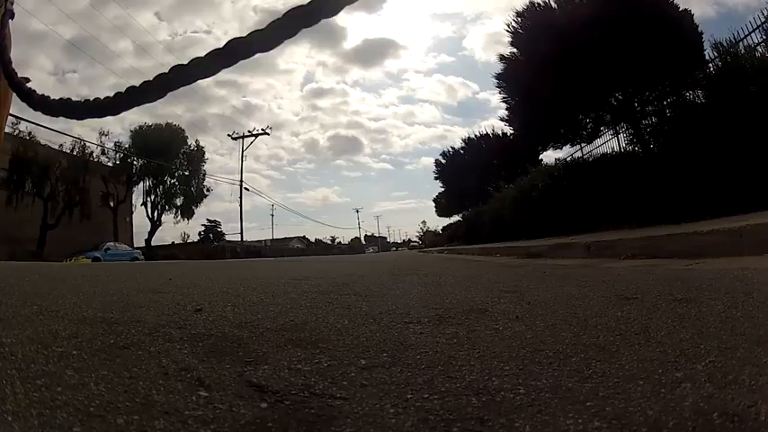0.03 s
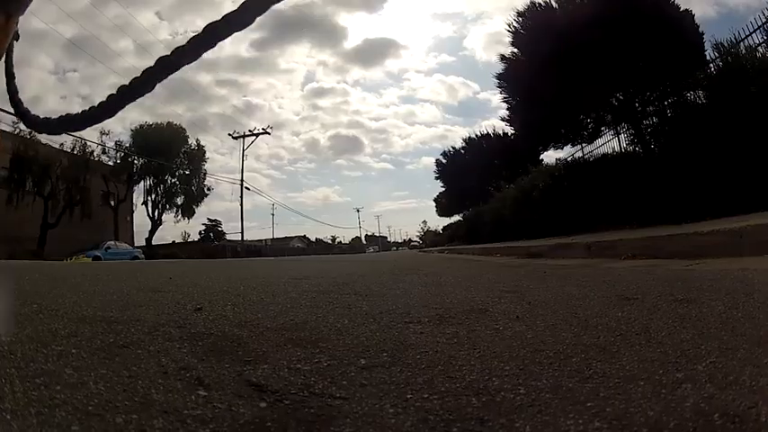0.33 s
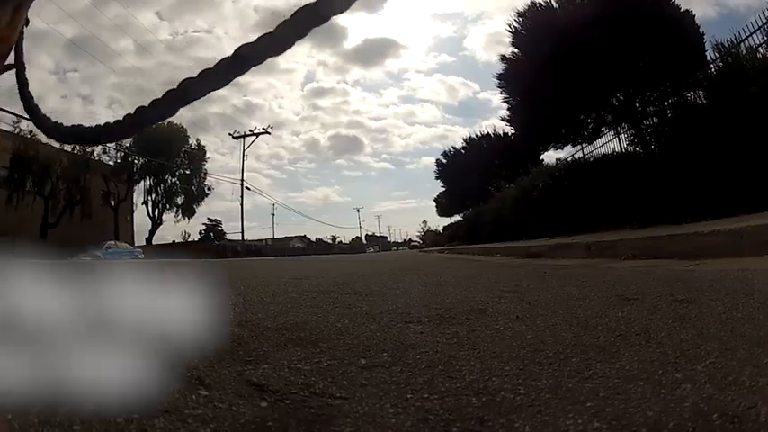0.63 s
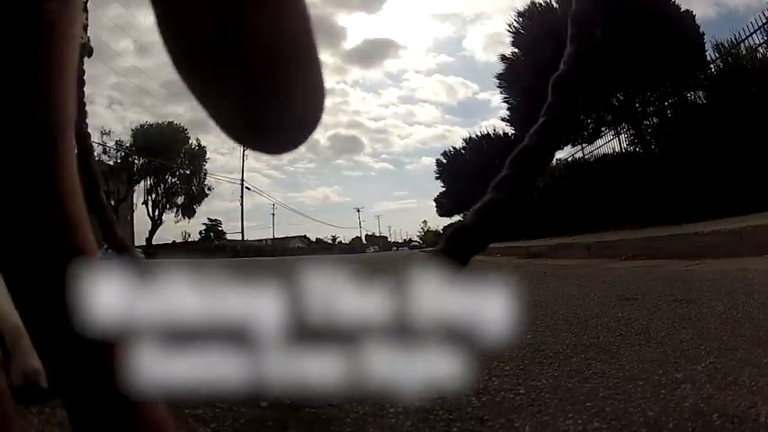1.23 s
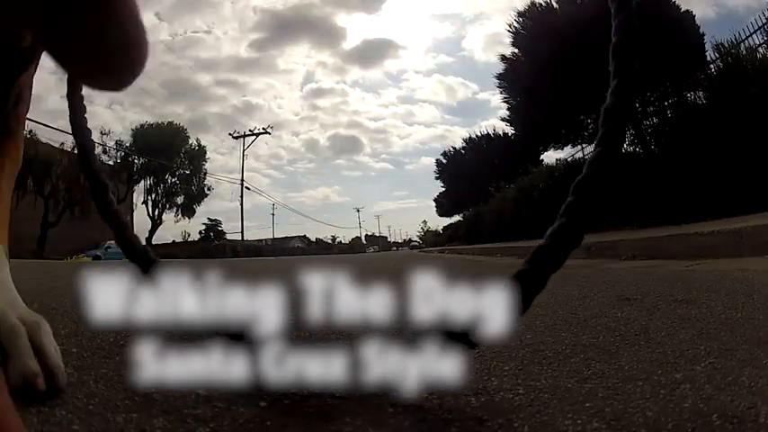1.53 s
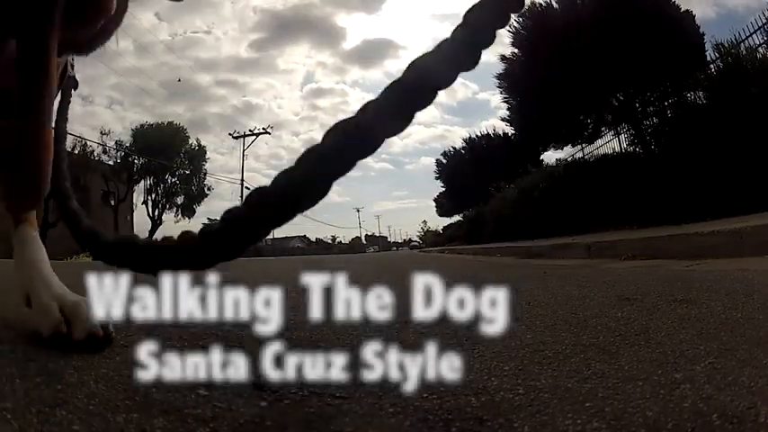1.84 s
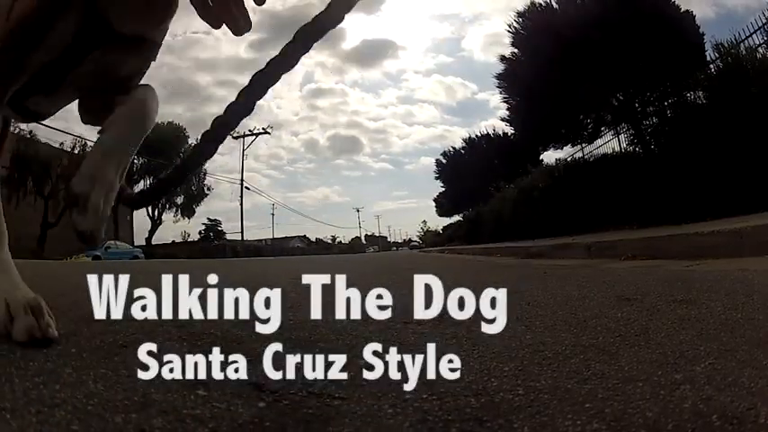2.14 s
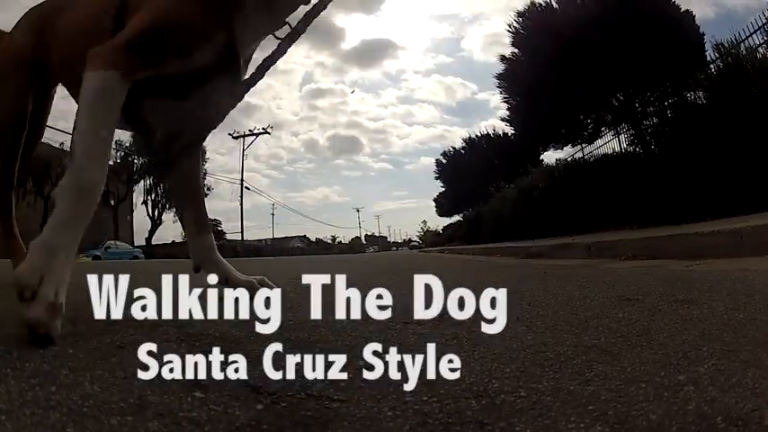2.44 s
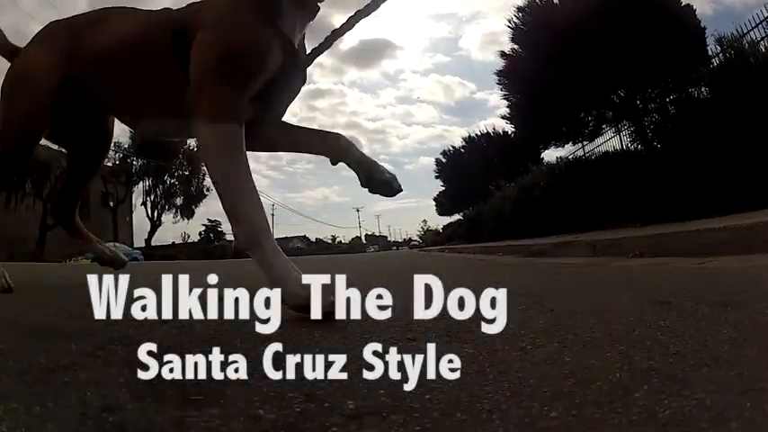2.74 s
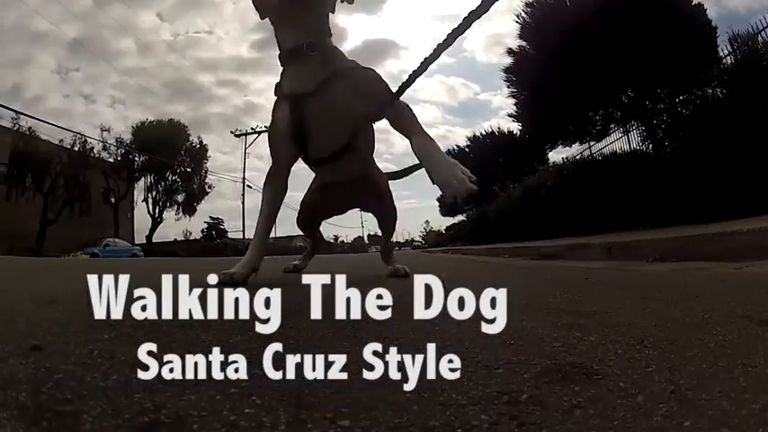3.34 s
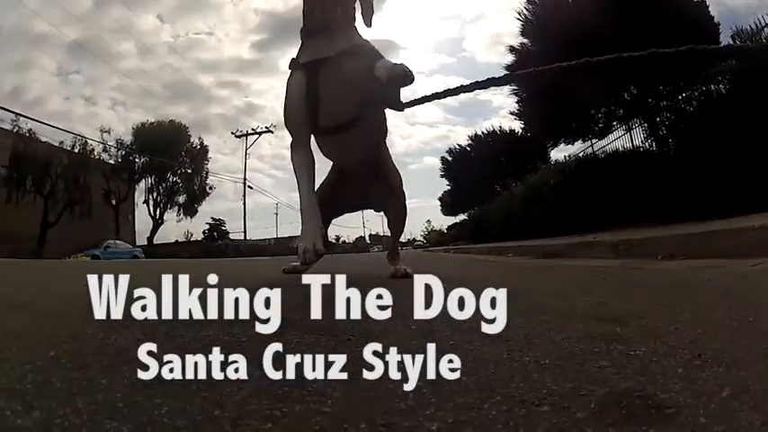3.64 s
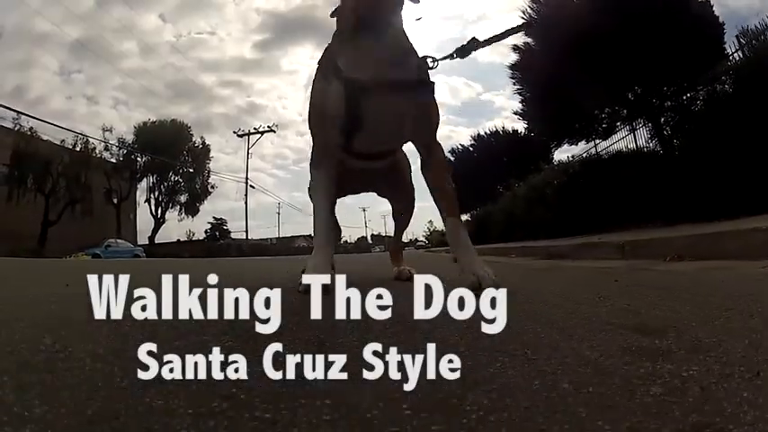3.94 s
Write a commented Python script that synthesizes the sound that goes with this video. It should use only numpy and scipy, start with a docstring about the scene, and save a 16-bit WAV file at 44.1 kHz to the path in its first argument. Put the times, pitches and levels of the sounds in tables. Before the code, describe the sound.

Close plastic knocks and leash rubbing, then a wheeled rig jolts and rumbles along a street.

```python
"""A camera sits low on a wheeled rig on a quiet street. First a hand and a rope leash knock and rub its
case, and the mount booms. From 1 s a small bird chirps now and then, and the leash drags over the case.
At 2.6 s the dog pulls: a hard jolt, then the rig rumbles, clunks and scuffs over asphalt to the end.
Throughout, the recorder samples coarsely, which mirrors the sound into a glassy treble;
it overloads on the hardest knocks."""
import sys
import numpy as np
from scipy import signal
from scipy.fft import rfft, irfft, next_fast_len
from scipy.io import wavfile
from scipy.ndimage import uniform_filter1d

SR = 44100
rng = np.random.default_rng(int(sys.argv[2]) if len(sys.argv) > 2 else 0)


def pcm_store(signal):
    """Save signal as 16-bit PCM."""
    levels = np.round(np.clip(np.atleast_2d(signal), -1, 1) * 32767)
    wavfile.write(sys.argv[1], SR, levels.astype(np.int16).T)


N = 176400
TIME = np.arange(N) / SR
RECORDER_HZ = 12000


def amp(db):
    return 10 ** (np.asarray(db) / 20)


def unit_rms(x):
    return x / np.sqrt(np.mean(x ** 2) + 1e-20)


def add(out, start_s, x):
    i = round(start_s * SR)
    out[i:i + len(x)] += x[:N - i]


def envelope(*curves):
    """Summed gain along curves of (s, dB) points, silent outside them."""
    gain = sum(amp(np.interp(TIME, *np.transpose(curve), left=-150, right=-150)) for curve in curves)
    return uniform_filter1d(gain, size=60)


def swell(centre_s, db, sigma_s):
    """Gaussian envelope."""
    return amp(db) * np.exp(-.5 * ((TIME - centre_s) / sigma_s) ** 2)


def coloured(x, spectrum, resonances=()):
    """Minimum-phase filter of (Hz, dB) points plus resonances; output at rms 1."""
    size = next_fast_len(len(x) + 4096, real=True) // 2 * 2
    f = np.fft.rfftfreq(size, 1 / SR)
    hz, db = np.transpose(spectrum)
    gain_db = np.interp(np.log(f + 1), np.log(hz + 1), db)
    gain_db -= 60 * np.clip(2 * f / RECORDER_HZ - 1, 0, 1)  # roll-off above the recorder's Nyquist
    for centre_hz, half_width_hz, lift_db in resonances:
        gain_db += lift_db / (1 + ((f - centre_hz) / half_width_hz) ** 2)
    cepstrum = irfft(np.log(amp(gain_db)), size)
    cepstrum[1:size // 2] *= 2
    cepstrum[size // 2 + 1:] = 0
    response = np.exp(rfft(cepstrum))
    return unit_rms(irfft(rfft(x, size) * response, size)[:len(x)])


def noise(spectrum):
    return coloured(rng.standard_normal(N), spectrum)


def wobble(count, span_samples):
    """Smoothed noise at rms 1."""
    return unit_rms(uniform_filter1d(rng.standard_normal(count), size=span_samples))


def evened(x, span_s):
    """Flattens level swings slower than span_s."""
    size = max(int(span_s * SR), 2)
    power = uniform_filter1d(uniform_filter1d(x * x, size), size)
    return x / np.sqrt(abs(power) + 1e-6)


def grains(per_s, spread_db):
    """Tiny random contacts of scattered strength."""
    impulses = (rng.random(N) < per_s / SR) * rng.choice([-1, 1], N)
    return impulses * amp(spread_db * rng.standard_normal(N))


def ring(modes, rise_s):
    """One second of decaying modes, each varied by up to 1 dB per strike."""
    t = TIME[:SR]
    ringing = sum(amp(db + rng.uniform(-1, 1) - 60 * t / t60_s) * np.sin(2 * np.pi * hz * t)
                  for hz, db, t60_s in modes)
    return (1 - np.exp(-t / rise_s)) * ringing


def contact(spectrum, hz, rise_s, t60_s, half_width_hz=280, lift_db=11):
    """Crack of a hard contact: a decaying noise burst, lifted around hz."""
    t = TIME[:SR // 8]
    burst = coloured(rng.standard_normal(len(t)), spectrum, [(hz, half_width_hz, lift_db)])
    return evened(burst, span_s=0.002) * amp(-60 * t / t60_s) * (1 - np.exp(-t / rise_s))


# Each row: frequency in Hz, gain in dB.
STREET_SPECTRUM = [(15, -28.5), (25, -10.5), (263, -3.5), (380, -9.5), (511, -11.5), (771, -15.5),
                   (947, -17), (5140, -24), (5900, -26.5), (7670, -76), (13000, -120)]
HISS_SPECTRUM = [(30, -1), (150, -3), (600, -19), (3000, -19), (6000, -25.5)]

def background():
    """Distant street in the centre; faint hiss in opposite polarity left and right."""
    street = amp(-63.5) * noise(STREET_SPECTRUM)
    hiss = amp(-75) * noise(HISS_SPECTRUM)
    return np.array([street + hiss, street - hiss])


def outdoors(x, flutter_db=4.5, echo_db=-22.5, echo_t60_s=0.13):
    """A far call flutters and trails a faint street echo."""
    t = TIME[:SR // 4]
    tail = rng.standard_normal(len(t)) * amp(-60 * t / echo_t60_s)
    direct = x * amp(flutter_db * wobble(N, span_samples=200))
    echo = signal.fftconvolve(direct, tail / np.linalg.norm(tail))[:N]
    return direct + amp(echo_db) * echo


# Each row: start in seconds, level in dB, nominal length in seconds, start and end pitch in Hz.
BIRD_CALLS = [(1.037, -45.5, 0.039, 5610, 5090), (1.649, -51, 0.051, 5600, 5100),
              (1.894, -52, 0.059, 6100, 5160), (2.32, -56, 0.056, 5880, 5260),
              (3.599, -56, 0.068, 4400, 4520), (3.66, -50, 0.033, 4000, 4390),
              (3.684, -56, 0.035, 4820, 5120), (3.72, -52, 0.036, 2700, 2450),
              (3.752, -57.5, 0.024, 4100, 3850), (3.785, -54, 0.059, 4520, 4860),
              (3.85, -52.5, 0.045, 6150, 5200), (3.858, -50, 0.059, 4530, 4590),
              (3.898, -55, 0.063, 4600, 4470)]

def bird(glide_s=0.0067, jitter_hz=85, peak_share=0.27):
    """Each call glides onto its pitch, peaks early and fades."""
    out, t = np.zeros(N), TIME[:SR // 5]
    for start_s, db, length_s, start_hz, end_hz in BIRD_CALLS:
        hz = end_hz + (start_hz - end_hz) * np.exp(-t / glide_s)
        hz += jitter_hz * wobble(len(t), span_samples=100)
        age = t / (peak_share * length_s)
        gain = amp(db) * (age * np.exp(1 - age)) ** 2
        add(out, start_s, gain * np.sin(2 * np.pi * np.cumsum(hz) / SR))
    return out


# Each row: centre in seconds, level in dB, Gaussian sigma in seconds.
SCRATCH_SWELLS = [(0.982, -59, 0.0038), (1.769, -61, 0.012), (1.876, -64, 0.041), (2.036, -59, 0.019),
                  (2.441, -47, 0.0027), (3.246, -48.5, 0.011), (3.28, -41, 0.0046)]
# Each row: frequency in Hz, gain in dB.
SCRATCH_SPECTRUM = [(500, -7.5), (1300, -21), (2000, 10), (2600, 1.5), (3400, 10), (4500, -4), (6000, -0.5)]

def scratches():
    """Claws and the leash clasp scratch close by, light and bright."""
    return sum(swell(*row) for row in SCRATCH_SWELLS) * noise(SCRATCH_SPECTRUM)


# Each row: centre in seconds, level in dB, Gaussian sigma in seconds, pitch in Hz.
RIG_CREAKS = [(3.281, -31, 0.0033, 1620), (3.44, -29, 0.0011, 2200), (3.99, -31, 0.0049, 2140)]

def creaks(waver_rms_hz=107.3):
    """Brief wavering squeaks as the rig takes the strain."""
    waver_hz = waver_rms_hz * noise([(200, 0.5), (600, -25.5), (6000, -77)])
    return sum(swell(centre_s, db, sigma_s) * np.sin(2 * np.pi * np.cumsum(hz + waver_hz) / SR)
               for centre_s, db, sigma_s, hz in RIG_CREAKS)


# One curve for the rolling, one per scuff. Each row: time in seconds, level in dB.
ROLL_CURVE = [(2.61, -18), (2.66, -45), (2.70, -41.5), (2.76, -25.5), (2.81, -34), (2.86, -14.5),
              (2.91, -22), (2.945, -28.5), (3.05, -27.5), (3.11, -56), (3.16, -50), (3.37, -43),
              (3.44, -39.5), (3.54, -32.5), (3.61, -43), (3.68, -43), (3.76, -83), (3.83, -42.5),
              (3.93, -42.5), (4, -46)]
SCUFF_CURVES = [
    [(2.198, -60), (2.218, -35.5), (2.228, -38.5), (2.246, -38), (2.256, -50), (2.28, -53.5), (2.31, -57)],
    [(2.61, -42.5), (2.64, -43.5), (2.69, -56.5), (2.725, -74.5), (2.76, -42.5), (2.78, -45), (2.825, -50),
     (2.853, -24.5), (2.89, -32), (2.92, -29.5), (2.94, -43.5), (3.03, -46), (3.11, -47.5), (3.15, -54),
     (3.32, -56.5), (3.44, -44.5), (3.5, -55), (3.545, -41.5), (3.57, -54), (3.615, -45), (3.65, -51),
     (3.77, -56.5), (3.9, -50), (4, -51.5)],
]
# Each row: frequency in Hz, gain in dB.
ROLL_SPECTRUM = [(80, -13), (170, 18.5), (260, -2.5), (350, -4.5), (450, -8), (590, 2), (720, -19.5),
                 (1200, -10), (1800, -65.5), (6000, -75.5)]
GRIT_SPECTRUM = [(200, -0.5), (600, 2), (1200, 1.5), (1600, -3.5), (2300, -1), (2650, -19.5), (3300, -18),
                 (3850, -13), (4400, -39.5), (6000, -33)]
# Each row: start in seconds, level in dB, T60 in seconds, contact frequency in Hz.
STONE_TICKS = [(2.216, -24.5, 0.025, 1230), (2.265, -34.5, 0.037, 1170), (2.697, -39, 0.062, 1400),
               (2.734, -28.5, 0.074, 1210), (2.7603, -20.5, 0.022, 890), (2.796, -31.5, 0.051, 1200),
               (2.845, -12.5, 0.036, 1630), (2.863, -11, 0.039, 1180), (2.873, -18, 0.013, 1980),
               (2.886, -19, .018, 1800), (2.902, -33, 0.0067, 1500), (2.981, -24.5, 0.024, 3300),
               (3.015, -20.5, 0.027, 1470), (3.041, -24, 0.019, 3560), (3.092, -29.5, 0.031, 3600),
               (3.178, -31.5, 0.024, 3600), (3.226, -31, 0.022, 1700), (3.265, -29, 0.044, 880),
               (3.356, -35, 0.071, 886), (3.385, -30, 0.023, 3400), (3.403, -23.5, 0.019, 800),
               (3.44, -27.5, 0.02, 2410), (3.534, -28.5, 0.045, 1390), (3.547, -31, 0.034, 1210),
               (3.879, -29, 0.028, 1190), (3.911, -36.5, 0.028, 1400)]

def asphalt():
    """Wheels roar on asphalt, grit crunches and single stones tick through the rig."""
    roar = evened(noise(ROLL_SPECTRUM), span_s=0.0092)
    grit = evened(coloured(grains(per_s=1300, spread_db=6.5), GRIT_SPECTRUM), span_s=0.015)
    out = envelope(ROLL_CURVE) * roar + envelope(*SCUFF_CURVES) * grit
    for start_s, db, t60_s, hz in STONE_TICKS:
        add(out, start_s, amp(db) * contact(GRIT_SPECTRUM, hz, rise_s=0.00092, t60_s=t60_s))
    return out


# One curve per leash stroke. Each row: time in seconds, level in dB.
RUB_CURVES = [
    [(.17, -42), (.205, -42.5), (.215, -52.5), (.24, -50), (.28, -74)],
    [(.415, -71), (.45, -53), (.475, -38), (.505, -49.5), (.53, -44.5), (.57, -47.5), (.585, -40.5),
     (.605, -62.5)],
    [(.635, -48.5), (.655, -55), (.67, -64.5)],
    [(1.383, -57), (1.392, -49), (1.43, -57.5), (1.46, -50), (1.476, -32.5), (1.492, -65), (1.53, -36.5)],
]
DRAG_CURVE = [(1.53, -36.5), (1.546, -14), (1.567, -17), (1.585, -25.5), (1.65, -30.5), (1.668, -45),
              (1.70, -58.5)]
RASP_CURVE = [(.671, -29), (.674, -21.5), (.684, -18), (.694, -19.5), (.70, -49.5), (.72, -77.5)]
# Each row: frequency in Hz, gain in dB.
RUB_SPECTRUM = [(100, -6), (350, -10), (750, -11), (1100, -4.5), (2350, -4), (2560, -21.5), (2850, -23.5),
                (3300, -7), (4200, -18.5), (6000, -26)]
DRAG_SPECTRUM = [(100, -3), (400, -8.5), (720, -7), (1100, -4), (2300, -3.5), (2600, -22.5), (3500, -8),
                 (4200, -20.5), (6000, -26)]
RASP_SPECTRUM = [(150, -2), (800, -20.5), (1300, -6), (2300, -3.5), (2550, -8.5), (3100, -1.5), (3700, -16),
                 (4200, -21), (6000, -19.5)]
# Each row: centre in Hz, half-width in Hz, lift in dB.
RUB_RESONANCES = [(1820, 150, 7.5), (3400, 180, 5)]
DRAG_RESONANCES = [(561, 24, 18.5), (1270, 42, 12), (1590, 27, 7), (1894, 40, 9.5), (2360, 30, 13.5),
                   (3063, 70, 4.5), (3450, 27, 8)]
RASP_RESONANCES = [(585, 30, 14.5), (1183, 60, 7), (1610, 28, 13.5), (2211, 48, 15.5), (2910, 35, 5.5),
                   (3630, 65, 13), (4675, 65, 25)]

def leash():
    """Rope sticks and slips on the case and wakes its resonances: light rubs, a hard drag, a rasp."""
    def friction(spectrum, resonances):
        slips = grains(per_s=3100, spread_db=2.0)
        return evened(coloured(slips, spectrum, resonances), span_s=0.023)

    rubs = envelope(*RUB_CURVES) * friction(RUB_SPECTRUM, RUB_RESONANCES)
    drag = envelope(DRAG_CURVE) * friction(DRAG_SPECTRUM, DRAG_RESONANCES)
    rasp = envelope(RASP_CURVE) * friction(RASP_SPECTRUM, RASP_RESONANCES)
    return rubs + drag + rasp


# Each row: start in seconds, level in dB.
CHASSIS_HITS = [(2.867, -12.5), (2.898, -16), (2.92, 1.5)]
# Each row: frequency in Hz, gain in dB, T60 in seconds.
CHASSIS_MODES = [(144.6, 5, 0.046), (226, -5.5, 0.027), (430, -2, 0.0228), (610, -15, 0.0098),
                 (1100, -5, 0.015)]

def clunks():
    """The rig bounces on its wheels and the chassis clunks."""
    out = np.zeros(N)
    for start_s, db in CHASSIS_HITS:
        add(out, start_s, amp(db) * ring(CHASSIS_MODES, rise_s=0.000186))
    return out


# Each row: start in seconds, level in dB.
BODY_BUMPS = [(0.27, -31), (.325, -31), (.465, -24.5), (1.42, -29), (1.56, -20.5), (1.679, -28),
              (1.724, -32.5), (1.887, -36.5), (2.199, -20), (2.215, -9.5), (2.2378, -14), (2.263, -13.5),
              (2.607, -5.5), (2.944, -27), (3.405, -23), (3.551, -19), (3.668, -26.5), (3.912, -20),
              (3.982, -36)]
# Each row: frequency in Hz, gain in dB, T60 in seconds.
BODY_MODES = [(62, -7.5, 0.037), (98, 0, 0.064), (161.8, -5.5, .04), (227.8, -4, 0.072),
              (586, -11.5, 0.062), (1155, -14, .03)]

def bumps(detune_share=0.052):
    """Soft bumps ring the rig's hollow body, each at a slightly different pitch."""
    out = np.zeros(N)
    for start_s, db in BODY_BUMPS:
        pitch_ratio = 1 + detune_share * rng.uniform(-1, 1)
        modes = [(hz * pitch_ratio, mode_db, t60_s) for hz, mode_db, t60_s in BODY_MODES]
        add(out, start_s, amp(db) * ring(modes, rise_s=0.0017))
    return out


# One curve per move of the rig. Each row: time in seconds, level in dB.
ROCKING_CURVES = [
    [(.11, -41), (.13, -34), (.165, -30), (.21, -31.5), (.245, -19), (.30, -25.5), (.345, -20),
     (.39, -35.5), (.44, -43)],
    [(.44, -53), (.467, -18.5), (.51, -37.5), (.56, -36.5), (.61, -35), (.665, -40)],
    [(.9, -66), (1.375, -65.5), (1.39, -38.5), (1.52, -34), (1.563, -11.5), (1.595, -21), (1.65, -23),
     (1.72, -31.5), (1.85, -45.5), (2.0, -46.5), (2.16, -46.5)],
    [(2.16, -34.5), (2.195, -40.5), (2.215, -11), (2.246, -11), (2.285, -6.5), (2.32, -24), (2.4, -42.5),
     (2.5, -48), (2.6, -55)],
    [(2.72, -19), (2.75, -8.5), (2.8, -22.5), (2.835, -3.5), (2.925, -8.5), (2.98, -14.5), (3.025, -15.5),
     (3.055, -12), (3.12, -27.5), (3.35, -54)],
    [(3.35, -28.5), (3.45, -9.5), (3.49, -18), (3.525, -8.5), (3.585, -17), (3.68, -9.5), (3.77, -24),
     (3.86, -20.5), (3.895, -13), (3.95, -21.5), (4, -22.5)],
]
# Each row: frequency in Hz, gain in dB.
RUMBLE_SPECTRUM = [(20, -29.5), (42, -16), (57, 6), (74, -10), (94, 8), (108, -3.5), (128, -5),
                   (160, -20.5), (260, -24.5), (500, -75.5)]
# Each row: start in seconds, level in dB.
MOUNT_JOLTS = [(.675, -14), (1.422, -27.5), (1.681, -22), (1.883, -36), (2.238, -15), (2.6043, -3.5),
               (3.028, -7), (3.0615, -10), (3.128, -9.5), (3.203, -15)]
# Each row: frequency in Hz, gain in dB, T60 in seconds.
MOUNT_MODES = [(92.44, 6.5, 0.38), (60, -18, .55), (44, -11, 0.038)]

def mount():
    """The mount rumbles while the rig moves and booms after each jolt."""
    out = envelope(*ROCKING_CURVES) * evened(noise(RUMBLE_SPECTRUM), span_s=0.085)
    for start_s, db in MOUNT_JOLTS:
        add(out, start_s, amp(db) * ring(MOUNT_MODES, rise_s=0.0046))
    return out


# Each row: start in seconds, level in dB, ringing relative to that level in dB, contact frequency in Hz.
CASE_KNOCKS = [(.14, -30.5, -5, 1300), (0.1616, 0, 1, 1250), (0.1788, -9.5, -5.5, 2600),
               (.197, -10, -3.5, 3080), (0.4664, -16, -5, 1806), (.515, -22.5, 0.5, 1840),
               (2.6043, 2.5, -2, 1840), (2.922, -18, -35, 600)]
# Each row: frequency in Hz, gain in dB.
CRACK_SPECTRUM = [(100, -10), (400, -3.5), (800, -15.5), (1500, 2), (2400, -5), (3500, -15.5),
                  (6000, -21.5)]
# Each row: frequency in Hz, gain in dB, T60 in seconds.
CASE_MODES = [(440, -15.5, 0.02), (533, -13.5, 0.021), (1246, -3, 0.017), (1500, -18.5, 0.0044),
              (2180, -12, 0.021), (2700, -19, 0.017), (3646, -7, 0.015), (4600, -22.5, 0.0017)]
METAL_MODES = [(463, -58, 1.0), (890, -54.5, .64)]

def knocks(rise_s=0.00056, push_db=-3, push_peak_s=0.0009):
    """The plastic case gives, cracks and rings at each knock; a metal part sings on after one."""
    out = np.zeros(N)
    age = TIME[:SR // 8] / push_peak_s
    push = amp(push_db) * age * np.exp(1 - age)
    for start_s, db, ring_db, hz in CASE_KNOCKS:
        crack = contact(CRACK_SPECTRUM, hz, rise_s, t60_s=0.017)
        add(out, start_s, amp(db) * (crack - push))
        add(out, start_s, amp(db + ring_db) * ring(CASE_MODES, rise_s))
    first_hard_knock_s = CASE_KNOCKS[1][0]
    add(out, first_hard_knock_s, ring(METAL_MODES, rise_s))
    return out


def scene():
    """All sources reach one microphone inside the case; the sound cuts in at 0.117 s."""
    rig = knocks() + mount() + bumps() + clunks()
    friction = leash() + asphalt() + scratches() + creaks()
    return (rig + friction + outdoors(bird()) + background()) * (TIME > 0.117)


def record(dry):
    """Coarse sampling, overload, sample-and-hold (mirror images in the treble), band limit."""
    hold_samples, cutoff_hz = 4, 15600
    padded = np.pad(dry, ((0, 0), (0, SR - N % SR)), mode="reflect")
    count = padded.shape[1]
    coarse = signal.resample_poly(padded, RECORDER_HZ, SR, axis=1)
    overloaded = np.clip(coarse, -1, 1)
    held = np.repeat(overloaded, hold_samples, axis=1)
    spectrum = rfft(held)[:, :count // 2 + 1] * SR / (hold_samples * RECORDER_HZ)  # resampled to SR
    f = np.fft.rfftfreq(count, 1 / SR)
    lowpass = 1 / np.sqrt(1 + (f / cutoff_hz) ** 140)
    return irfft(spectrum * lowpass, count)[:, :N]


dry = scene()
out = record(dry)
pcm_store(out)
```